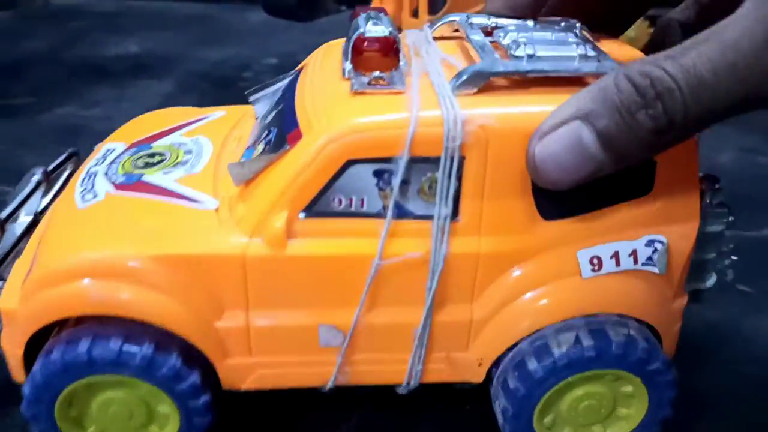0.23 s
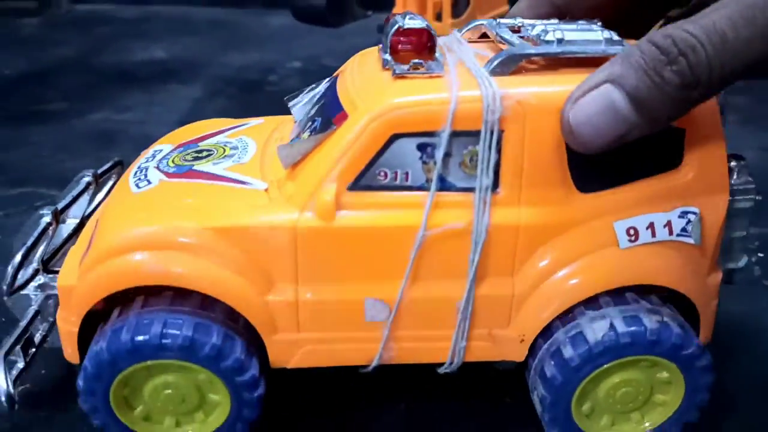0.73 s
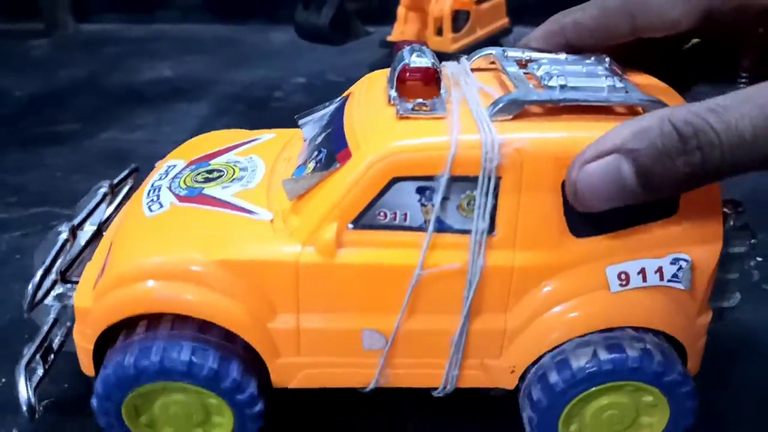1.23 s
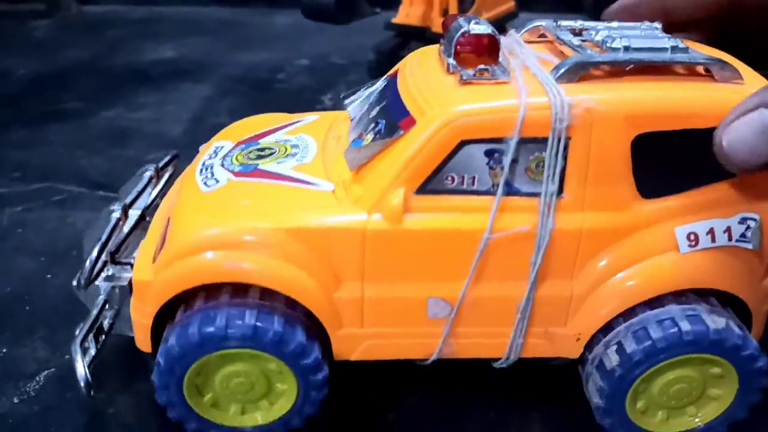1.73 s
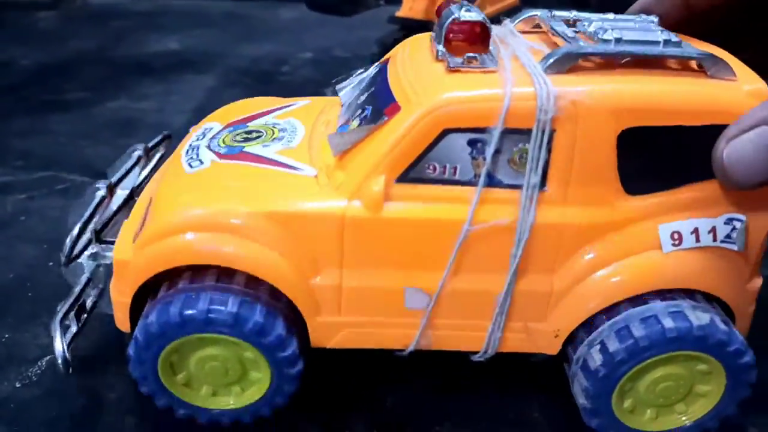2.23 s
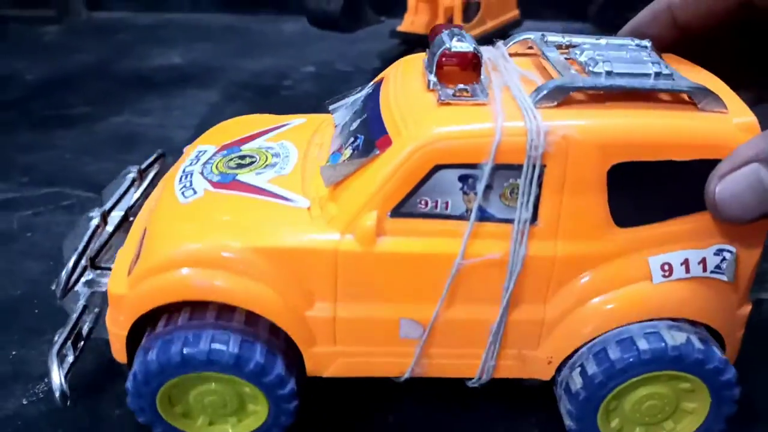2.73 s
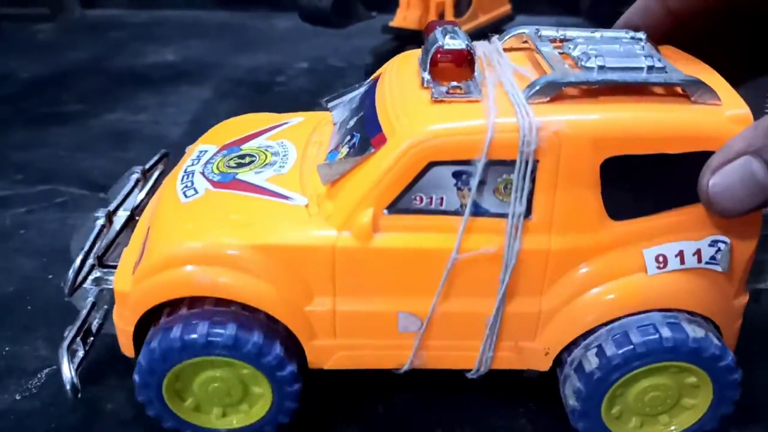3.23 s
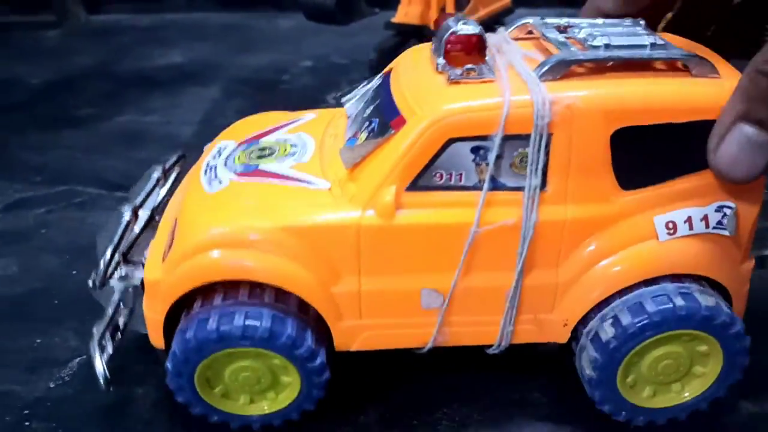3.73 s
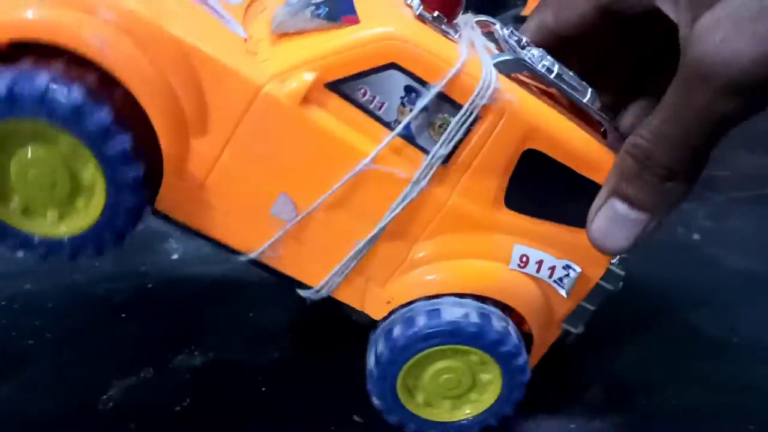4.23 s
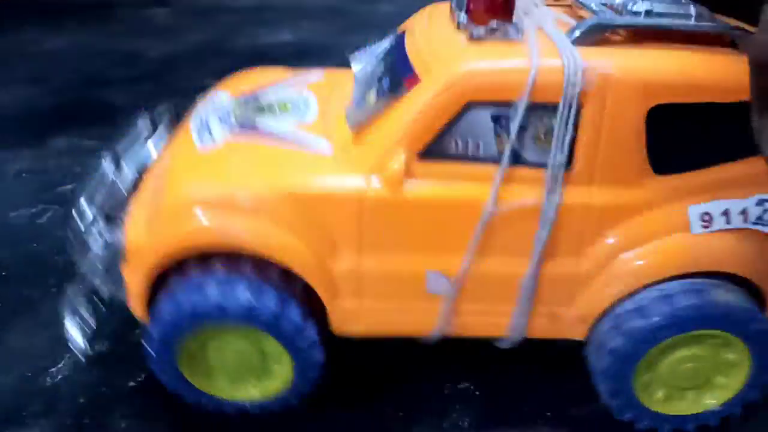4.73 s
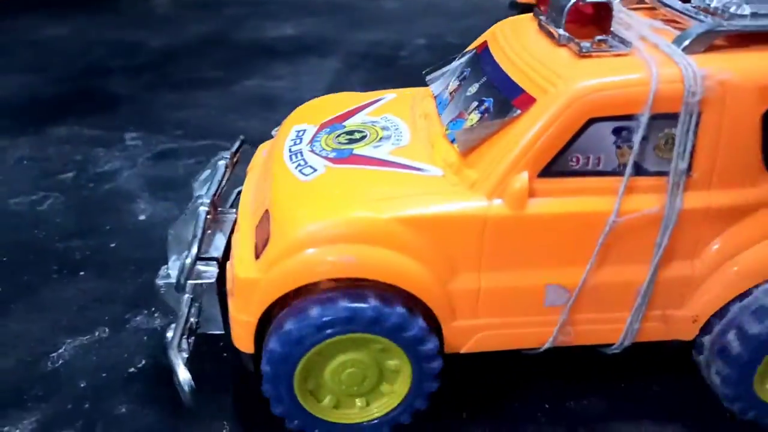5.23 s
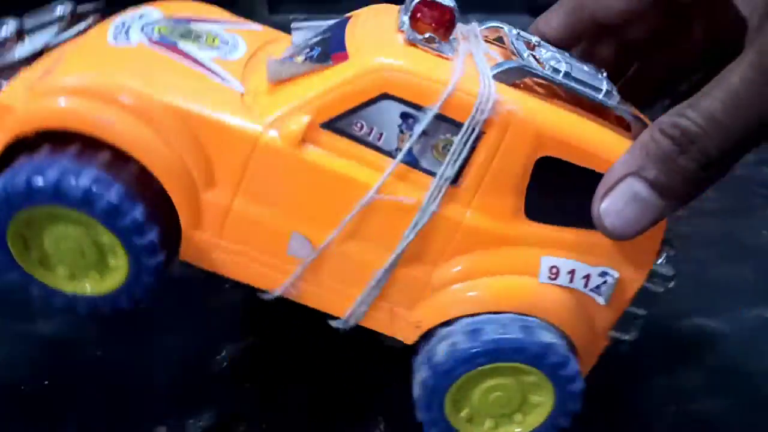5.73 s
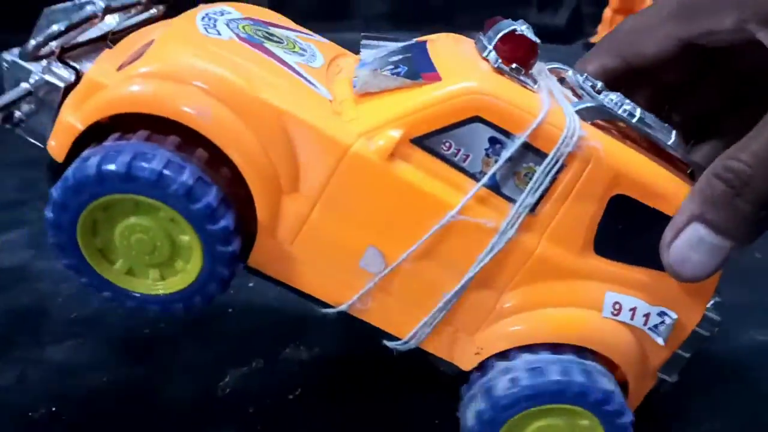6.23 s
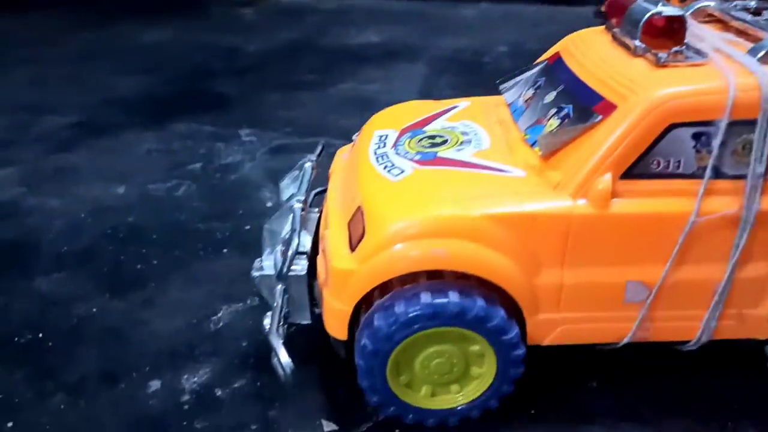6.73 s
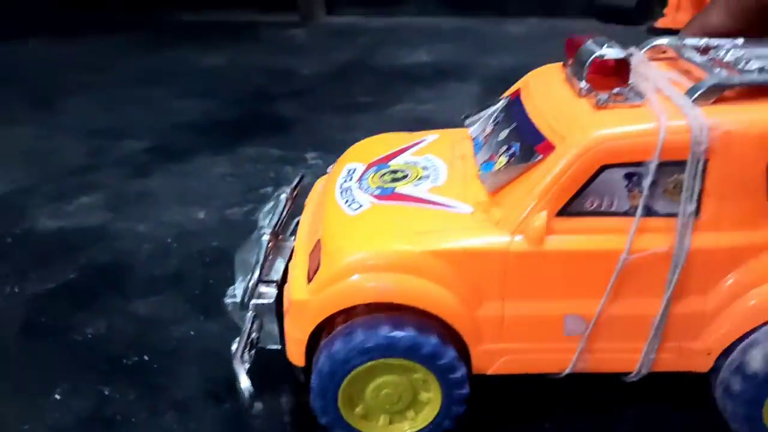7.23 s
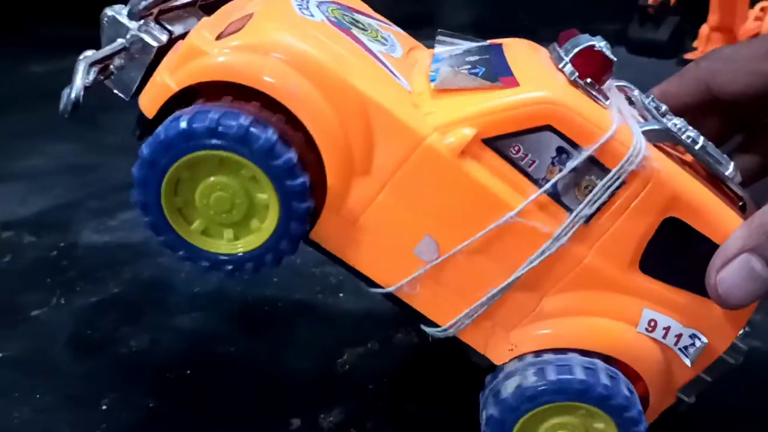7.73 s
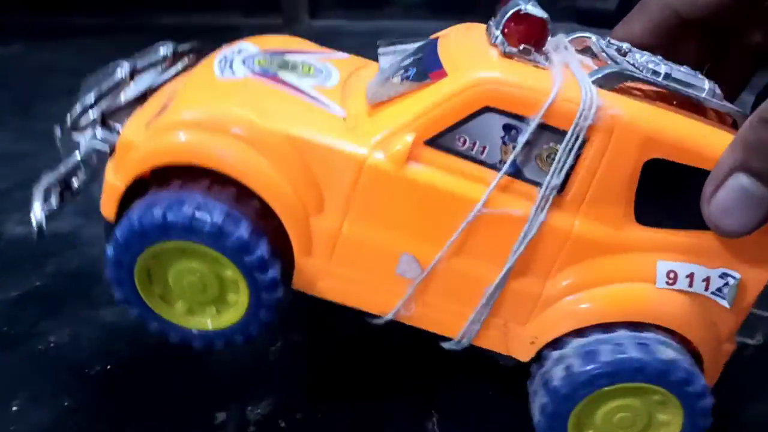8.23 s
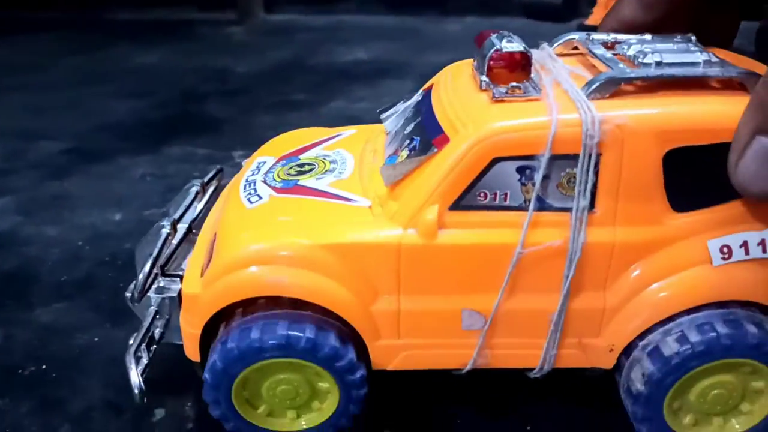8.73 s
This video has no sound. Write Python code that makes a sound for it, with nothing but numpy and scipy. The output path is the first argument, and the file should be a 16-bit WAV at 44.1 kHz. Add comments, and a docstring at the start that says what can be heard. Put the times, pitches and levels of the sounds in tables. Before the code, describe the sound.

A hollow plastic toy car is pushed back and forth on a hard floor, rumbling, scraping and rattling, its front wheels slapping down three times.

```python
"""Toy car on a hard floor

A hollow plastic toy car is handled in a small room, close to the microphone. First it is nudged to
and fro, and its loose axles knock, snap and chatter. Then it is rolled in long strokes: the treads
drum on the shell and the dry axles scrape. Three times it is tipped up on its rear wheels and its
nose drops back, so that the shell booms and the loose trim rings."""
import sys
import numpy as np
from scipy import signal
from scipy.fft import rfft, irfft, next_fast_len
from scipy.io import wavfile
from scipy.ndimage import uniform_filter1d

SR = 44100
rng = np.random.default_rng(int(sys.argv[2]) if len(sys.argv) > 2 else 0)


def pcm_store(signal):
    """Save signal as 16-bit PCM."""
    levels = np.round(np.clip(np.atleast_2d(signal), -1, 1) * 32767)
    wavfile.write(sys.argv[1], SR, levels.astype(np.int16).T)


N = 396459
TIME = np.arange(N) / SR
FFT_SIZE = next_fast_len(N + SR)
HZ = np.maximum(np.arange(FFT_SIZE // 2 + 1) * SR / FFT_SIZE, 1)
EDGE_LOW_HZ, EDGE_TOP_HZ = 1580, 6700   # pitch range of the crackling plastic edges
FLEXES_PER_S = 8   # how often the hand bends the shell
CUTOFF_HZ = 15900

# The nose lifts and drops back. Each row: landing time in seconds, ring level in dB,
# seconds in the air, clang pitch in Hz, clang level in dB relative to the ring level.
WHEELIES = [(4.847, -7.5, 0.55, 2130, -29.5), (6.615, -6.5, 0.87, 1920, -14), (8.485, -9, 0.97, 1330, -12)]
# Treble of the scrape and rattle, with the microphone's deep dip at 9-11 kHz.
# Each row: frequency in Hz, level in dB.
CLICK_TREBLE = [(2700, 0.5), (4650, 6), (5050, -4.5), (5900, -2.5), (6450, 5.5), (7700, 6), (8400, -3),
                (9100, -35.5), (11200, -42), (11800, -7.5), (15500, -12.5)]
# Tone of treads and axles rubbing. Each row: frequency in Hz, level in dB.
SCRAPE_COLOUR = [(500, 2.0), (1400, 1.5), (2050, 8.0)] + CLICK_TREBLE


def rolling(rumble_db, scrape_db, buzz_db):
    """Tread blocks patter into the hollow shell; grit and dry axles scrape in step with them."""
    # Tone of the shell drummed by the treads. Each row: frequency in Hz, level in dB.
    roll_colour = [(40, -58), (110, -26.5), (200, -19), (270, -13), (335, -13), (450, -6), (580, -1.5),
                   (690, -1), (820, -2.5), (1050, -14), (1300, -10.5), (1700, -24.5), (2600, -38),
                   (6000, -87)]
    rumble, scrape, rear_db = pushes()
    nose = nose_height()
    treads = contacts(per_s=1100, spread_db=1.5, even_s=0.038)
    tyre_lumps = from_db(3.5 * wander(per_s=30))   # uneven tyres make the rumble swell and dip
    shell = through(rumble * tyre_lumps * treads, impulse_response(roll_colour))
    # slow rolling or weight on the rear wheels wakes the deep boom and takes drive off the front ones
    brisk_db, boom_hz, front_hz = -23, 238, 1190
    slowness = np.minimum(brisk_db - to_db(rumble), 20)
    load = rear_db + 7.5 * nose + 0.36 * slowness
    shell = boost(shell, boom_hz, width_hz=124, db=0.96 * load)
    shell = boost(shell, front_hz, width_hz=1200, db=-0.67 * load)
    # the hollow under the shell rises in pitch as the nose lifts, and wavers as the hand presses
    hollow_hz = 638 + 95 * nose + 44.7 * wander(FLEXES_PER_S)
    shell = shell + from_db(1) * gliding_resonance(shell, hollow_hz, width_hz=64)
    # the rear axle rubs more with the nose up; the hand rubs faintly even at rest
    scrape = scrape * from_db(6 * nose) + from_db(-71.5)
    # the grit scratches hardest as each tread block presses down
    pressure = np.sqrt(0.22 + 0.5 * np.abs(uniform_filter1d(treads[0] ** 2, size=130)))
    grains = contacts(per_s=3200, spread_db=1.5, even_s=0.063)
    grit = through(scrape * pressure * grains, impulse_response(SCRAPE_COLOUR))
    rasp = grit + from_db(buzz_db) * panel_buzz(grit)
    return from_db(rumble_db) * shell + from_db(scrape_db) * rasp


def pushes(coast_s=0.11, coast_share=0.069):
    """The hand moves the car, which coasts a little; rumble, scrape and rear weight follow its speed."""
    # Each row: start in seconds, then seconds spent speeding up, holding steady and slowing down,
    # then rumble, scrape and weight on the rear wheels, all in dB.
    strokes = [(0.0, 0.00069, 0.027, 0.057, -28, -38.5, 8.5), (0.08, 0.1, 0.1, 0.055, -26.5, -48.5, 3),
               (0.31, 0.02, 0.024, 0.018, -22.5, -35.5, 0), (0.392, 0.063, 0.012, 0.026, -27, -45, 9),
               (0.58, 0.033, 0.12, 0.14, -42.5, -63.5, 5.5), (0.88, 0.069, 0.1, 0.054, -34.5, -49.5, 2.5),
               (1.11, 0.11, 0.058, 0.031, -29.5, -50.5, 4.5), (1.33, 0.053, 0.034, 0.12, -45.5, -49.5, 9),
               (1.547, 0.054, 0.023, 0.23, -32.5, -50.5, -6), (1.788, 0.089, 0.15, 0.038, -28.5, -44, 4.5),
               (2.12, 0.092, .04, 0.42, -42.5, -54, 8.5), (2.46, 0.13, 0.078, 0.24, -40.5, -59.5, 4.5),
               (2.75, 0.13, 0.055, 0.19, -32, -50.5, 5.5), (3.199, 0.074, 0.012, 0.048, -26.5, -44, -5),
               (3.38, 0.11, 0.16, 0.12, -43, -61.5, 5.5), (3.834, 0.053, 0.51, 0.062, -24, -39.5, 5),
               (4.499, 0.013, 0.081, 0.046, -40.5, -50.5, 2.5), (4.598, 0.15, 0.19, 0.15, -21, -41.5, -1),
               (5.292, 0.24, 0.14, 0.16, -20, -42, 0.5), (5.702, 0.07, 0.055, 0.19, -19, -39, 5),
               (6.079, 0.067, 0.032, 0.09, -41, -51.5, -5), (6.198, 0.33, 0.15, 0.08, -22.5, -43.5, 2),
               (7.05, 0.082, 0.031, 0.033, -27, -53, 1.5), (7.18, 0.04, 0.093, 0.049, -24, -43.5, -3.5),
               (7.35, 0.051, .15, 0.047, -25, -43.5, -4), (7.549, 0.14, 0.053, 0.18, -21.5, -43, 3),
               (7.98, 0.18, 0.018, 0.058, -34.5, -61, -5.5), (8.178, 0.23, 0.12, 0.13, -24.5, -45, 4.5),
               (8.8, 0.11, 0.13, 0.13, -29, -54.5, -0.5)]
    rumble, scrape, load_db = np.zeros((3, N))
    keep = np.exp(-1 / (coast_s * SR))
    for start, up_s, steady_s, down_s, rumble_db, scrape_db, rear_db in strokes:
        span = slice(int(start * SR), int((start + 2) * SR))
        hand = np.interp(TIME[span], start + np.cumsum([0, up_s, steady_s, down_s]), [0, 1, 1, 0])
        lingering = signal.lfilter([1 - keep], [1, -keep], hand)
        speed = np.abs(hand + coast_share * (lingering - hand))
        rumble[span] += from_db(rumble_db) * speed ** 0.94
        scrape[span] += from_db(scrape_db) * speed ** 0.82
        load_db[span] += rear_db * np.sqrt(speed)
    return rumble, scrape, load_db


def nose_height():
    """How high the nose is, from 0 to 1: a smooth arch that ends at each landing."""
    return sum(np.sin(np.pi * np.clip((landing - TIME) / air_s, 0, 1)) ** 2
               for landing, _, air_s, _, _ in WHEELIES)


def panel_buzz(grit, swell_db=6, pitch_share=0.056):
    """The scrape rings the plastic panels; each swells and shifts as the hand bends the shell."""
    # Each entry: the pitch of one panel in Hz.
    panel_pitches = [1330, 2086, 2440, 3180]
    out = 0
    for hz in panel_pitches:
        swell = from_db(swell_db * wander(per_s=17))
        bent_hz = hz * (1 + pitch_share * wander(FLEXES_PER_S))
        out = out + swell * gliding_resonance(grit, bent_hz, width_hz=200)
    return out


def axle_knocks(thud_db, rattle_db):
    """The loose axles jolt: the shell thuds while many hard edges crunch against each other."""
    # Knocks of the wheels and axles. Each row: start in seconds, thud level in dB, rattle level in dB,
    # fade time of the chatter in seconds, pitch of the struck spot in Hz.
    main_knocks = [(0.082, -22, -38, 0.049, 790), (0.1, -22.5, -23.5, 0.022, 860),
                   (0.157, -15, -20, 0.0034, 1500), (0.164, -23, -26, 0.008, 1420),
                   (0.2, -20, -31.5, 0.029, 700), (0.275, -20.5, -28, 0.035, 423),
                   (0.6, -27, -39.5, 0.0087, 1020), (0.68, -26, -45, 0.016, 860),
                   (0.763, -22.5, -35, 0.0054, 1420), (0.88, -16, -28.5, 0.0082, 535),
                   (0.902, -17.5, -35, 0.013, 241), (0.923, -18.5, -30.5, 0.012, 467),
                   (1.123, -22.5, -33, 0.013, 563), (1.145, -25.5, -33, 0.027, 1050),
                   (1.259, -27, -35.5, 0.0081, 700), (1.343, -24.5, -43, 0.0092, 630),
                   (1.357, -25, -39.5, 0.019, 290), (1.385, -23, -34.5, 0.0094, 1110),
                   (1.516, -33, -64, 0.016, 850), (1.618, -22.5, -48, 0.0063, 836),
                   (1.636, -13, -31, 0.0036, 733), (1.71, -28.5, -54, 0.0027, 840),
                   (1.868, -21, -25, 0.011, 1510), (1.903, -22, -33, 0.024, 690),
                   (1.94, -24, -34, 0.0091, 920), (1.982, -21, -24.5, 0.012, 1550),
                   (2.072, -21.5, -28, 0.01, 396), (2.082, -19.5, -39, 0.011, 830),
                   (2.131, -24, -40, 0.0088, 534), (2.187, -21.5, -38, 0.0058, 626),
                   (2.269, -26, -35, 0.021, 317), (2.304, -21, -36, 0.019, 323),
                   (2.375, -16.5, -24, 0.01, 240), (2.39, -14, -40, 0.0066, 670),
                   (2.439, -21.5, -30.5, 0.022, 593), (2.502, -18, -31.5, 0.017, 894),
                   (2.596, -25, -37.5, 0.018, 228), (2.758, -17, -27.5, 0.011, 233),
                   (2.836, -24.5, -40, 0.05, 605), (2.897, -26.5, -34.5, 0.0085, 920),
                   (2.994, -17.5, -24, 0.0057, 916), (3.002, -15, -40, 0.0034, 740),
                   (3.064, -27, -44, 0.017, 323), (3.108, -23.5, -38, 0.032, 240),
                   (3.204, -25, -40, 0.025, 560), (3.262, -23, -39, 0.0056, 830),
                   (3.276, -17, -28.5, 0.0089, 855), (3.3, -21, -34, 0.0068, 840),
                   (3.359, -25, -38, 0.029, 330), (3.427, -17.5, -37, 0.0043, 690),
                   (3.441, -17.5, -27.5, 0.01, 1020), (3.462, -21, -45, 0.0046, 730),
                   (3.526, -23, -34.5, 0.013, 600), (3.576, -24, -44, 0.0029, 716),
                   (3.777, -25, -44, 0.0068, 850), (3.833, -13.5, -22.5, 0.0035, 756),
                   (3.843, -13, -22.5, 0.0077, 775), (4.011, -15.5, -26, 0.0037, 790),
                   (4.121, -17, -34, 0.015, 417), (4.155, -17, -34, 0.017, 725),
                   (4.278, -22, -21, 0.025, 270), (4.346, -10, -30.5, 0.019, 660),
                   (4.766, -18.5, -48, 0.017, 726), (4.847, -23.5, -10.5, 0.0047, 1414),
                   (4.858, -29, -23.5, 0.029, 910), (4.902, -16, -33, 0.011, 565),
                   (5.091, -31.5, -39, 0.0052, 410), (5.274, -34.5, -54, 0.0092, 540),
                   (5.48, -8.5, -42, 0.0048, 617), (6.551, -16.5, -38, 0.003, 640),
                   (6.614, -14, -11, 0.0071, 1330), (6.636, -14.5, -25.5, 0.035, 578),
                   (6.994, -33, -51, 0.0056, 890), (7.423, -19.5, -42, 0.0025, 1330),
                   (7.759, -9.5, -24, 0.0031, 820), (7.797, -16, -30, 0.0097, 343),
                   (8.258, -18, -39, 0.0045, 730), (8.411, -20, -34, 0.0088, 720),
                   (8.483, -12, -17.5, 0.013, 534), (8.52, -16.5, -31, 0.019, 515),
                   (8.79, -21.5, -37.5, 0.0041, 1270)]
    # Tone of the knocked shell. Each row: frequency in Hz, level in dB.
    thud_colour = [(40, -43.5), (110, -20.5), (200, -14), (290, -10.5), (420, -5), (560, -2), (700, 0),
                   (850, -6.5), (1100, -9), (1350, -10), (1750, -22.5), (2600, -27.5), (6000, -68.5)]
    # Tone of plastic clicking on plastic. Each row: frequency in Hz, level in dB.
    rattle_colour = [(500, -6), (1400, 8.5), (2000, 4.5)] + CLICK_TREBLE
    starts, thuds, rattles, fades, spot_hz = np.transpose(main_knocks + small_knocks())
    edge_hz = random_pitches(EDGE_LOW_HZ, 3120, count=300)
    bounces = contacts(per_s=1300, spread_db=2.5, even_s=0.0049)
    clicks = contacts(per_s=1100, spread_db=-1.0, even_s=0.007)
    clicks = 0.7 * (clicks + edge_crackle(clicks, sharpness=7, count=12))
    thud = strikes(zip(starts, thuds, fades, spot_hz), thud_colour, bounces,
                   first_hit=3.0, spot_sharpness=6.8, spot_db=10.5, soft_hz=1500, firm_hz=3560)
    rattle = strikes(zip(starts, rattles, fades, edge_hz), rattle_colour, clicks,
                     first_hit=7.2, spot_sharpness=7.6, spot_db=6.5, soft_hz=7000, firm_hz=30200)
    return from_db(thud_db) * thud + from_db(rattle_db) * rattle


def small_knocks(per_s=24, fade_s=0.0051):
    """Extra rows of knocks at random times, as strong as the rolling is at that moment."""
    rumble, scrape, _ = pushes()
    samples = np.flatnonzero(rng.random(N - SR // 10) < per_s / SR)
    spot_hz = random_pitches(387, 1360, count=N)
    return [(TIME[i], to_db(rumble[i]) - 0.5, to_db(scrape[i]) + 4.5, fade_s, spot_hz[i])
            for i in samples]


def strikes(rows, colour, chatter, first_hit, spot_sharpness, spot_db, soft_hz, firm_hz):
    """Each knock is one click and a dying chatter of bounces; its force and spot set its tone."""
    # Each entry: a pitch in Hz at which the walls of the shell ring.
    wall_pitches = [566, 712, 820, 973, 1338, 1990, 2420]
    firm_db, db_per_octave = -16.5, 19.5
    out, response = np.zeros((2, N)), impulse_response(colour)
    side_hits = rng.random((300, 2))
    wall_mixes = -11 + 9.5 * rng.standard_normal((300, len(wall_pitches)))   # dB, new for every knock
    for (start, db, fade_s, spot_hz), (lag_ms, side), mix in zip(rows, side_hits, wall_mixes):
        span = slice(int(start * SR), int((start + 8 * fade_s + 0.03) * SR))
        fade = np.exp(-(TIME[span] - start) / fade_s)
        burst = fade * chatter[:, span]
        burst[0, 0] += first_hit
        burst[1, int(lag_ms * SR / 1000)] += first_hit * np.sign(side - 0.5)
        # weaker knocks are duller
        top_hz = np.clip(firm_hz * 2 ** ((db - firm_db) / db_per_octave), soft_hz, CUTOFF_HZ)
        burst = signal.lfilter(*signal.butter(2, top_hz, fs=SR), through(burst, response))
        walls = sum(from_db(wall_db) * resonance(burst, hz, width_hz=70)
                    for hz, wall_db in zip(wall_pitches, mix))
        burst = boost(burst + walls, spot_hz, spot_hz / spot_sharpness, spot_db)
        # the energy of the knock is set by its level and length
        scale = np.sqrt(np.sum(fade ** 2) / np.sum(burst ** 2, axis=1, keepdims=True))
        out[:, span] += from_db(db) * burst * scale
    return out


def edge_crackle(clicks, sharpness, count):
    """Every click lands on a random edge and rings at that edge's pitch."""
    edge_hit = rng.integers(0, count, N)
    rings = sum(resonance(clicks * (edge_hit == edge) + 1e-18, hz, hz / sharpness) / np.sqrt(hz)
                for edge, hz in enumerate(np.geomspace(EDGE_LOW_HZ, EDGE_TOP_HZ, count)))
    return rings / rings.std()


def landings(clang_s=0.15):
    """The front wheels slap down and set shell, trim and room ringing; one loose part adds a clang."""
    # Pitches that ring after a landing: shell, trim and a long low room tone.
    # Each row: pitch in Hz, level in dB, seconds to fade by 60 dB.
    landing_rings = [(510, -20, 0.41), (604, -13.5, 0.42), (734, -26.5, 0.44), (962, -23, 0.28),
                     (1234, -24.5, 0.37), (3100, -34, 0.075), (4160, -32, 0.13), (4430, -30, 0.24),
                     (6300, -7.5, 0.028)]
    out = np.zeros((2, N))
    for landing, db, _, clang_hz, clang_db in WHEELIES:
        hz, ring_db, ring_s = np.transpose(landing_rings + [(clang_hz, clang_db, clang_s)])[:, :, None]
        first = int(landing * SR)
        t = TIME[:min(SR, N - first)]
        rings = from_db(db + ring_db) * np.exp(-np.log(1000) * t / ring_s) * np.sin(2 * np.pi * hz * t)
        signs = rng.choice([-1, 1], (2, len(hz)))
        out[:, first:first + len(t)] += signs @ rings
    return out


def snaps(fade_s=0.0025, width_hz=1350):
    """Hard edges snap past each other: a dry, bright crack rings its own edge and the thin trim."""
    # Each row: start in seconds, level in dB, pitch of the edge in Hz.
    edge_snaps = [(0.099, -4.5, 4430), (0.113, -15, 4060), (0.275, -10, 4450), (1.001, -18, 7200),
                  (1.869, -9.5, 4560), (2.373, -9.5, 4700), (2.868, -12, 4160), (3.245, -21, 5570),
                  (3.274, -16.5, 4560), (3.832, -11, 6300), (4.278, -7, 5200)]
    out = np.zeros((2, N))
    for start, db, hz in edge_snaps:
        span = slice(int(start * SR), int((start + 10 * fade_s) * SR))
        crack = np.exp(-(TIME[span] - start) / fade_s) * rng.standard_normal((2, N))[:, span]
        edge = resonance(resonance(crack, hz, width_hz), hz, width_hz)
        trim = resonance(resonance(crack, EDGE_TOP_HZ, width_hz), EDGE_TOP_HZ, width_hz)
        out[:, span] += from_db(db) * (edge + from_db(-9.5) * trim)
    return out


def finger_slip(start_s, gain_db, fade_s, low_hz):
    """A brief thin hiss, like a fingertip slipping on the shell."""
    fade = (TIME > start_s) * np.exp(-np.abs(TIME - start_s) / fade_s)
    hiss = through(fade * rng.standard_normal((2, N)), impulse_response(SCRAPE_COLOUR))
    return from_db(gain_db) * signal.sosfilt(signal.butter(4, low_hz, "high", fs=SR, output="sos"), hiss)


def left_and_right(mid_side):
    """Mid is what both channels share, side how they differ: short waves reach each by another path."""
    # Stereo width. Each row: frequency in Hz, level of side relative to mid in dB.
    stereo_width = [(60, 0), (160, -12), (450, -15.5), (740, -15.5), (1220, -2), (2000, 0.5), (6000, -0.5)]
    width = gain_curve(stereo_width, HZ)
    mid, side = filtered(mid_side, np.array([np.ones_like(width), width]) / np.sqrt(1 + width ** 2))
    return np.array([mid + side, mid - side])


def room_echo(x, low_db, high_db, gap_s):
    """The room's echo dies away band by band; the treble, beamed at the walls, comes back stronger."""
    # Each row: frequency in Hz, seconds the echo takes to fade by 60 dB.
    echo_times = [(100, 0.34), (2000, 0.38), (7000, 0.18), (15000, 0.1)]
    t = TIME[:int(0.7 * SR)]
    band_edges = np.geomspace(50, 18000, 9)
    tail = 0
    for low, high in zip(band_edges, band_edges[1:]):
        centre = np.sqrt(low * high)
        echo_s = np.interp(centre, *np.transpose(echo_times))
        fade = np.exp(-np.log(1000) * t / echo_s) * np.clip(t / gap_s - 1, 0, 1)
        band_filter = signal.butter(2, [low, high], "band", fs=SR, output="sos")
        band = signal.sosfilt(band_filter, rng.standard_normal((2, len(t))))
        gain = from_db(np.interp(centre, [700, 2500], [low_db, high_db]))
        tail = tail + gain * band * fade / np.sqrt(np.sum(fade ** 2))
    return filtered(x, rfft(tail, FFT_SIZE))


def still_air():
    """The faint, steady hush of the room, partly the same on the left and right."""
    # Tone of the hush. Each row: frequency in Hz, level in dB.
    air_colour = [(25, -22), (60, -7), (110, 3.5), (250, -8.5), (600, -2.5), (1100, -31), (2500, -57.5),
                  (7500, -24.5), (9500, -53.5), (15000, -26)]
    hush = from_db(-57) * through(rng.standard_normal((3, N)), impulse_response(air_colour))
    return 0.83 * hush[0] + 0.72 * hush[1:]


def contacts(per_s, spread_db, even_s):
    """Tiny random impacts, as mid and side streams, with their power evened out over even_s seconds."""
    sizes = from_db(spread_db * np.minimum(rng.exponential(1, (2, N)), 4))
    signs = rng.choice([-1, 1], (2, N))
    clicks = sizes * signs * (rng.random((2, N)) < per_s / SR)
    power = uniform_filter1d(clicks ** 2, max(int(even_s * SR), 2))
    return clicks / np.sqrt(np.maximum(power, 1e-4))


def wander(per_s):
    """A random line, mostly between -1 and 1, that changes course per_s times a second."""
    points = rng.standard_normal(2000)
    return np.interp(TIME * per_s, np.arange(len(points)), points)


def random_pitches(low_hz, high_hz, count):
    """Random pitches, equally likely in every octave of the range."""
    return low_hz * (high_hz / low_hz) ** rng.random(count)


def resonance(x, hz, width_hz):
    """Keep the part of a sound near one pitch, so that it rings there."""
    return signal.lfilter(*signal.iirpeak(hz, hz / width_hz, fs=SR), x)


def boost(x, hz, width_hz, db):
    """Turn the part of a sound near one pitch up or down."""
    return x + (from_db(db) - 1) * resonance(x, hz, width_hz)


def gliding_resonance(x, hz, width_hz):
    """A resonance whose pitch moves: shift that pitch down to zero, smooth, and shift back."""
    turn = np.exp(2j * np.pi * np.cumsum(hz) / SR)
    keep = np.exp(-np.pi * width_hz / SR)
    return 2 * np.real(turn * signal.lfilter([1 - keep], [1, -keep], x * turn.conj() + 1e-18))


def impulse_response(colour, size=8192):
    """The short sound that one perfect tap makes on an object with this tone."""
    gain = gain_curve(colour, np.maximum(np.arange(size // 2 + 1) * SR / size, 1))
    cepstrum = irfft(np.log(gain / np.sqrt(np.mean(gain ** 2))))
    # folding onto the first half packs the energy right after the tap (minimum phase)
    cepstrum[1:size // 2] *= 2
    cepstrum[size // 2 + 1:] = 0
    return irfft(np.exp(rfft(cepstrum)))[None, :SR // 40]


def through(x, response):
    """Play each row of a signal through an impulse response."""
    return signal.oaconvolve(x, response, axes=1)[:, :x.shape[1]]


def filtered(x, response):
    """Multiply each frequency of a sound by its own gain."""
    return irfft(rfft(x, FFT_SIZE) * response, FFT_SIZE)[..., :N]


def gain_curve(points, at_hz):
    """Join rows of Hz and dB into a gain for every frequency asked for."""
    hz, db = np.transpose(points)
    return from_db(np.interp(np.log(at_hz), np.log(hz), db))


def from_db(db):
    """Decibels to gain."""
    return 10 ** (np.asarray(db) / 20)


def to_db(gain):
    """Gain to decibels."""
    return 20 * np.log10(gain + 1e-6)


def scene():
    """The car, its echo in the room and the still air."""
    car = rolling(rumble_db=-4.5, scrape_db=-1.63, buzz_db=-2.5)
    car = car + axle_knocks(thud_db=0.2, rattle_db=-0.5) + landings() + snaps()
    car = car + finger_slip(start_s=0.413, gain_db=-20.5, fade_s=0.01, low_hz=8500)
    air = still_air()
    return left_and_right(car) + room_echo(car[0], low_db=-13.5, high_db=-8.5, gap_s=0.00071) + air


def record(dry):
    """Round off the loudest peaks and steeply cut the highest treble."""
    ceiling = 0.85
    rounded = dry / (1 + (dry / ceiling) ** 4) ** 0.25
    return filtered(rounded, 1 / np.sqrt(1 + (HZ / CUTOFF_HZ) ** 160))


dry = scene()
out = record(dry)
pcm_store(out)
```